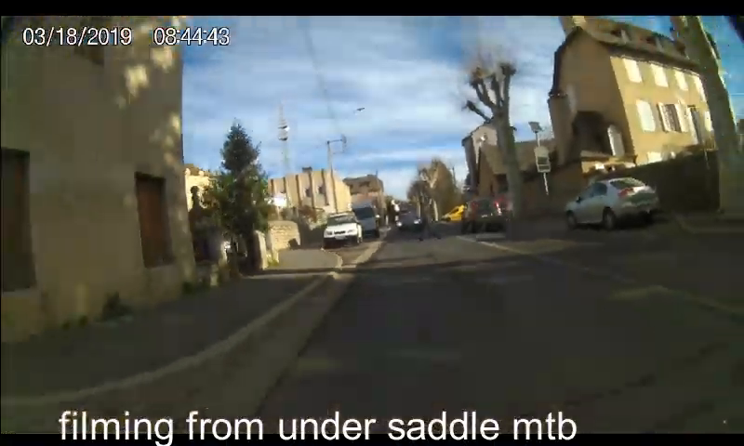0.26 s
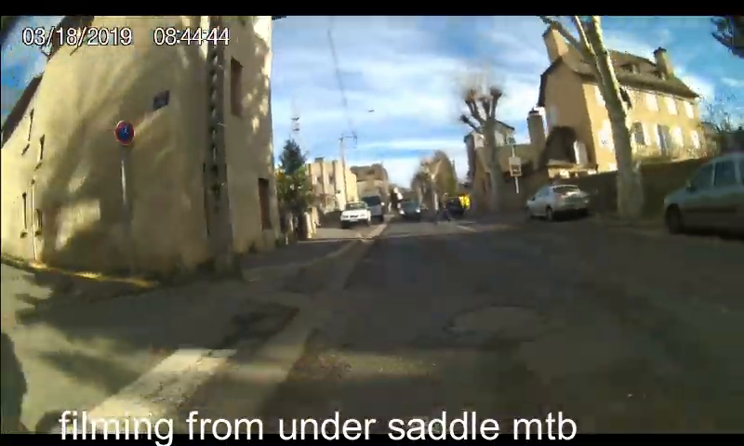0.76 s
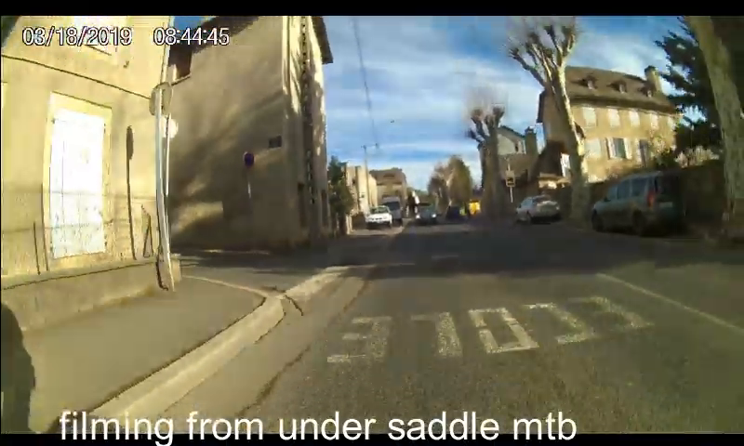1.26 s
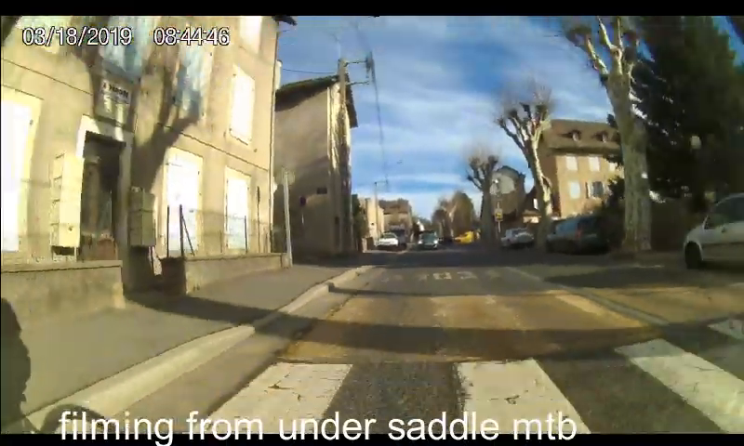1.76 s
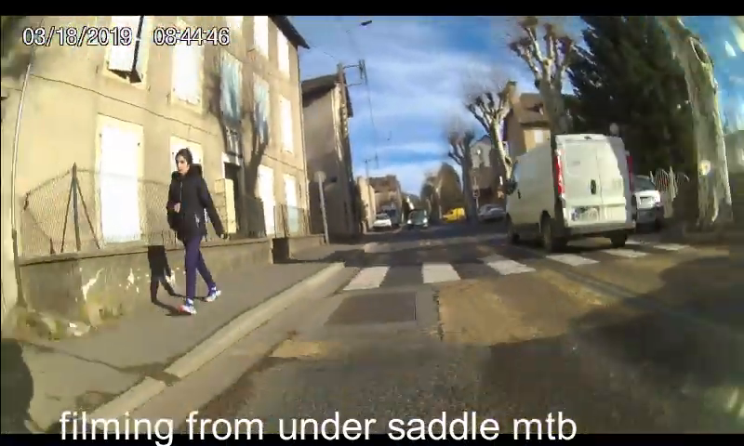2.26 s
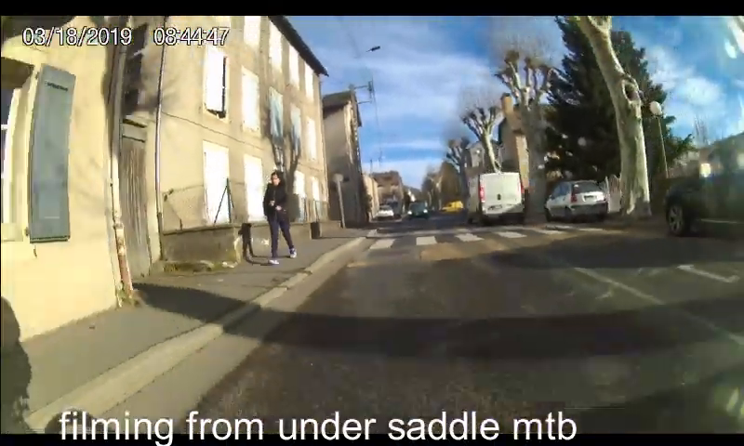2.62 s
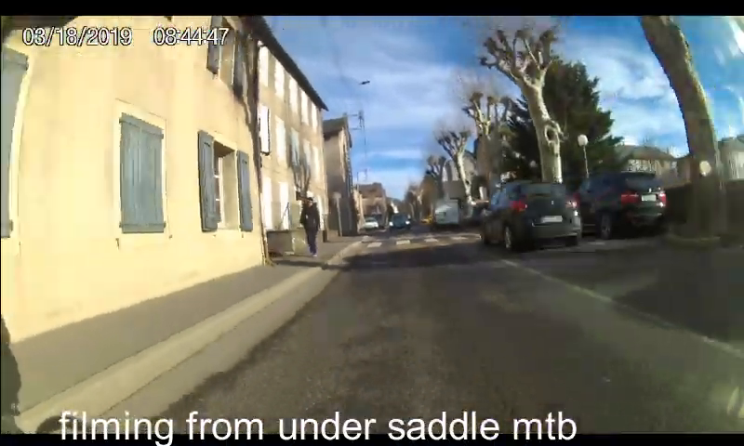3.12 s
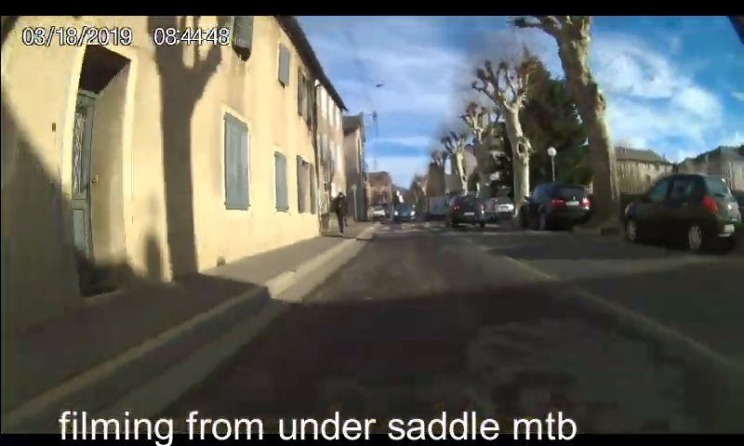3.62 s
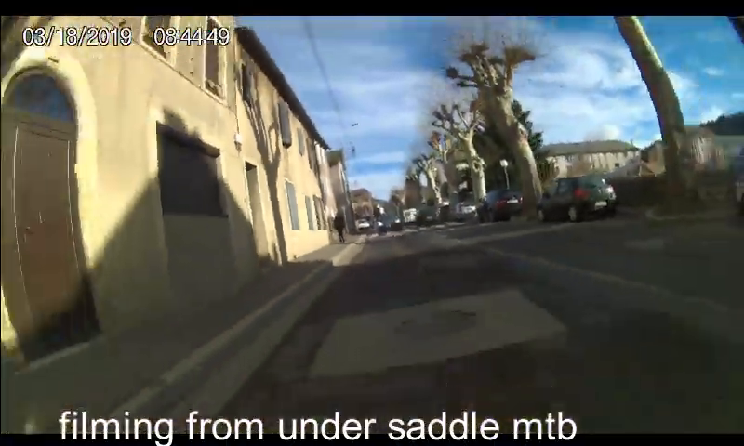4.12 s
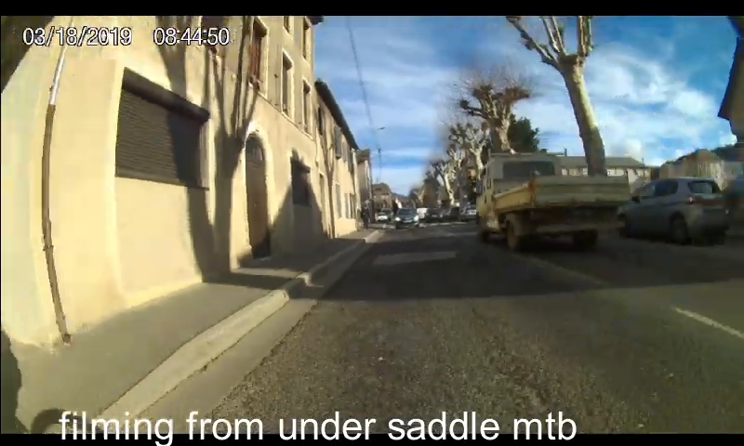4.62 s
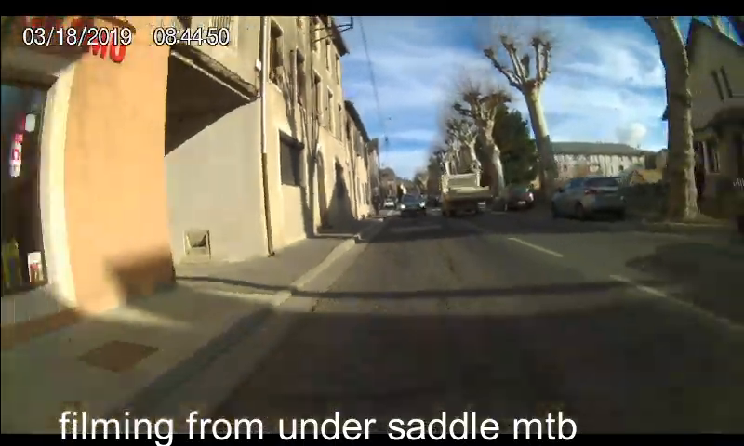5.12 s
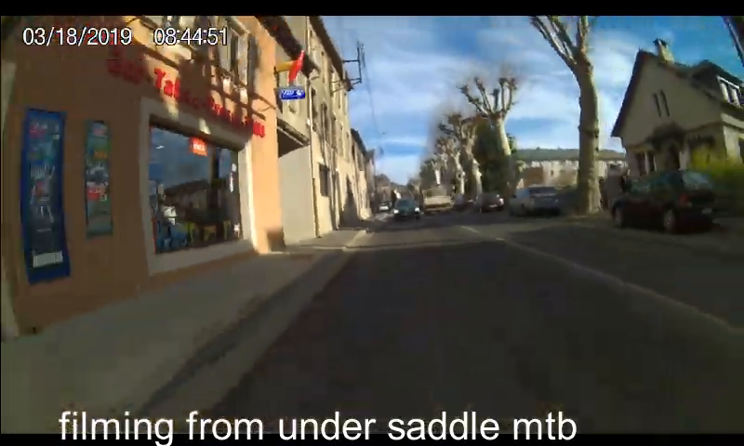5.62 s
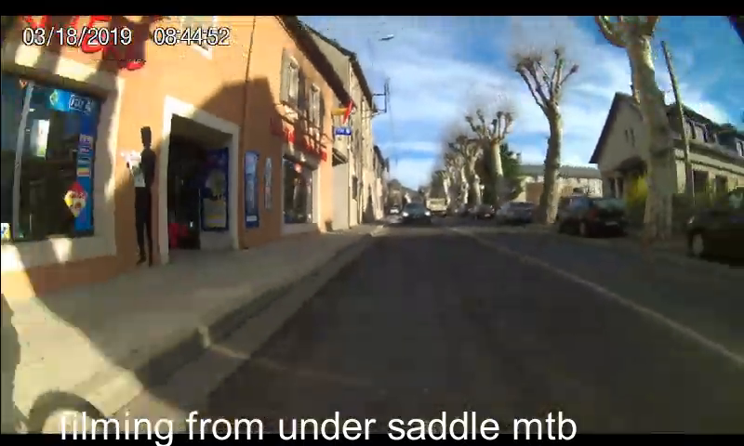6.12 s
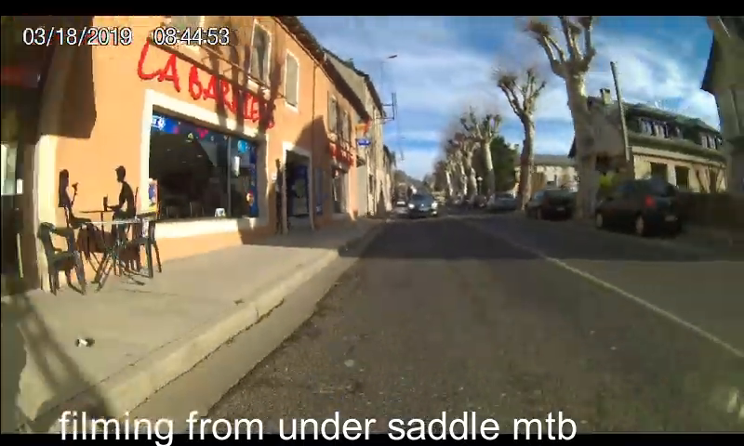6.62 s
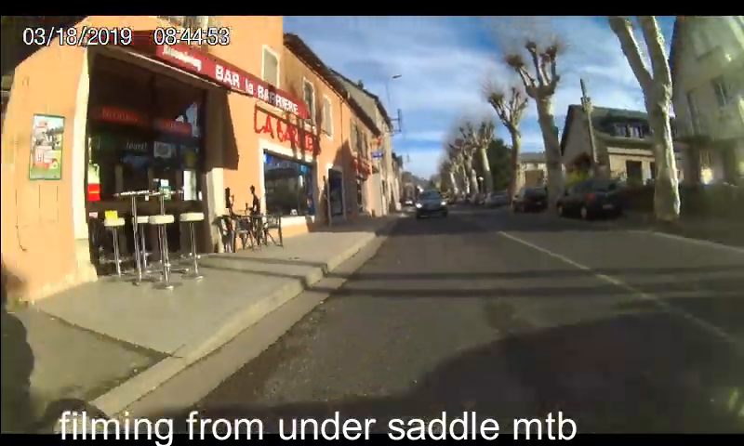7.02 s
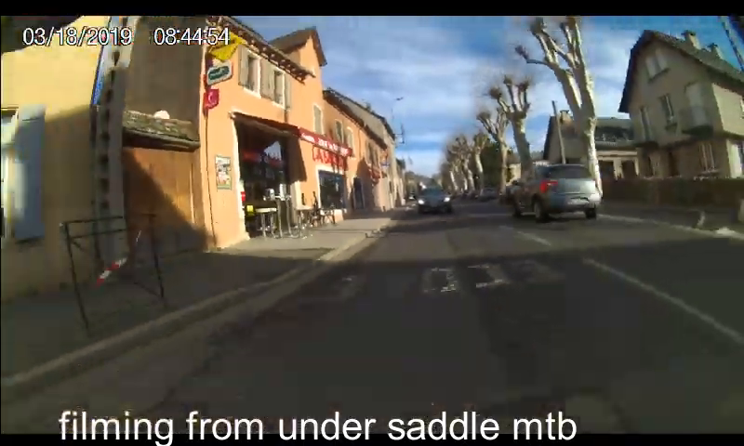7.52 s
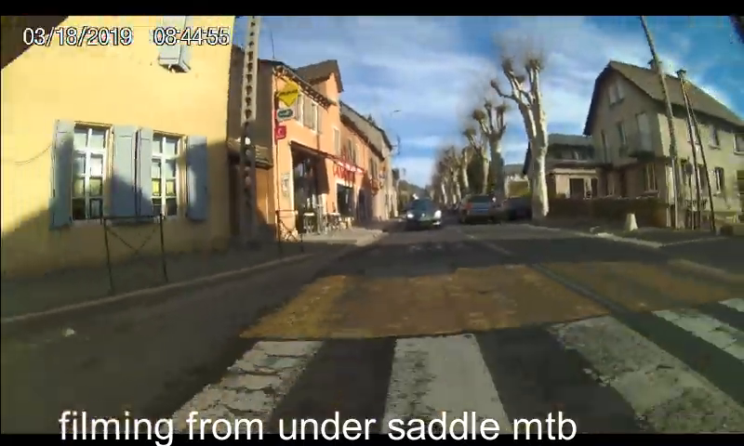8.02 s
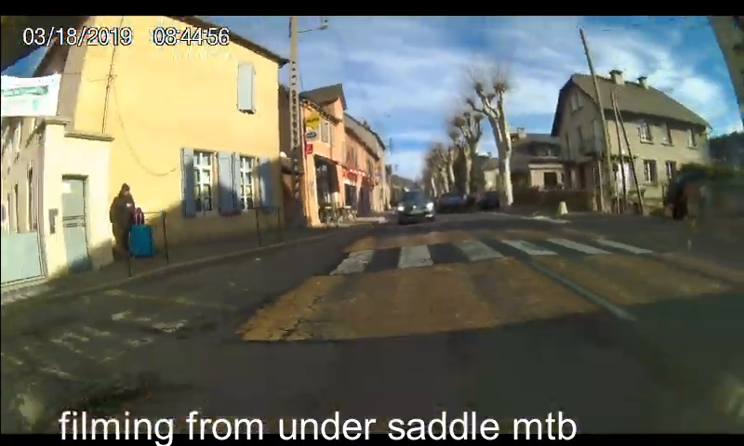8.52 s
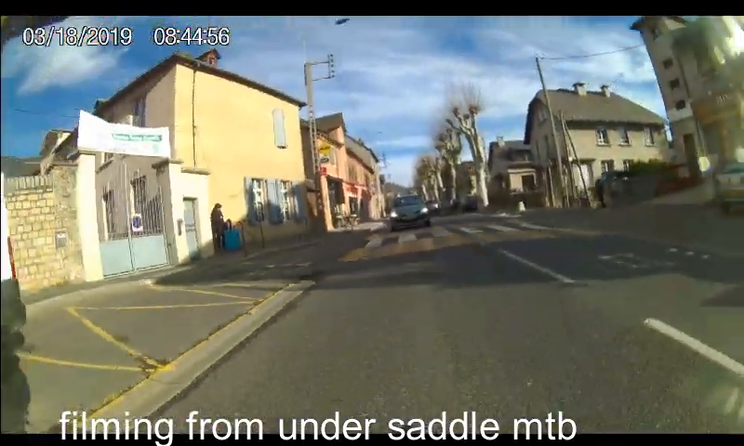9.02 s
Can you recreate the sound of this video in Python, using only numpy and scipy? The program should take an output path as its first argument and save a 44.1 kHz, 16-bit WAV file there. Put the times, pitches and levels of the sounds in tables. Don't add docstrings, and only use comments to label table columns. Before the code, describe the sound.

A small plastic camera mounted under a bicycle saddle rattles on a paved street. Dry, hollow clacks come unevenly, roughly ten per second, first fairly plain, then with looser clicking and chatter over patched road and a raised crossing. A quiet frame buzz and low wind rumble lie underneath. The microphone is inside the knocked case, very close, muffled in the treble, clipping on hard blows.

```python
import sys
import numpy as np
from scipy import signal
from scipy.fft import rfft, irfft
from scipy.io import wavfile
from scipy.ndimage import uniform_filter1d

SR = 44100
rng = np.random.default_rng(int(sys.argv[2]) if len(sys.argv) > 2 else 0)


def inscribe(sig):
    pcm = np.round(np.clip(np.atleast_2d(sig).T, -1, 1) * 32767)
    wavfile.write(sys.argv[1], SR, pcm.astype(np.int16))


def undo_db(level):
    steps = np.asarray(level, float) / 20
    return 10 ** steps


N = 408366

# start in seconds, frame buzz level in dB, wind level in dB.
RIDE_LEVELS = [(0.0, -34.5, -45), (0.46, -36.5, -53), (0.82, -36.5, -56.5), (2.71, -35.5, -51.5),
               (2.81, -34.5, -50), (3.61, -36.5, -59.5), (4.13, -37, -51), (4.74, -36, -50),
               (5.16, -36, -56), (5.67, -33.5, -55), (5.96, -34, -59.5), (6.5, -34.5, -50),
               (7.19, -33.5, -50.5), (7.45, -35, -50.5), (8.85, -34, -50.5), (9.26, -31.5, -49.5)]

# frequency in Hz, level in dB, t60 in seconds.
FRAME_MODES = [(360, -7, 0.023), (756, 0.5, 0.014), (1040, 7, 0.012), (1362, 9, 0.023), (1982, 5, 0.018),
               (2780, -9.5, 0.039), (3040, -6.5, 0.019)]
# frequency in Hz, level in dB, t60 in seconds.
TYRE_CAVITY_MODES = [(258, 0, .12)]
# frequency in Hz, level in dB, t60 in seconds.
MOUNT_MODES = [(2050, -5, .006), (2470, 0, .009), (2850, -1, .007), (3150, -5, .006)]
# frequency in Hz, level in dB, t60 in seconds.
CLIP_MODES = [(1510, -10.5, 0.036), (2114, 5, 0.0099), (2963, 10, 0.0054), (3770, 10.5, 0.0029),
              (4290, 5, 0.0057), (5100, -3, 0.004)]
# frequency in Hz, level in dB, t60 in seconds.
CLIP_CRACK_MODES = [(6700, 6, 0.003), (9650, 3, 0.0014), (11300, 6, 0.002), (12700, 4, 0.002)]
# frequency in Hz, level in dB, t60 in seconds.
CASE_MODES = [(390, -6, .016), (775, -7, .024), (1070, 5, .007), (1356, 13, .020), (1456, -2, .033)]
CASE_SIGNS = [-1, 1, 1, -1, 1]
# frequency in Hz, level in dB, t60 in seconds.
DOOR_MODES = [(1775, 12, .022), (1856, 21, .013), (2009, 17, .008)]
DOOR_SIGNS = [-1, 1, -1]
# frequency in Hz, level in dB, t60 in seconds.
LID_MODES = [(2380, -10, .015), (2777, 5, .012), (3019, 2, .010)]
LID_SIGNS = [1, 1, -1]
# frequency in Hz, gain in dB.
MIC_RESPONSE = [(2500, 0), (3600, -2), (4400, -9), (5200, -19), (6200, -37), (7000, -36), (7900, -45),
                (8800, -35), (10000, -31), (15500, -31), (15900, -46), (17000, -75)]

# time in seconds, blow in dB.
EVEN_BLOWS = [(.0202, -8), (.0741, -5.5), (.1697, -23), (.2762, 2.5), (.399, -8.5), (.4351, -1),
              (.4752, -2.5), (.515, -6.5), (.598, .5), (.679, -7), (.7793, -16.5), (.8377, -3.5),
              (.9231, -1.5), (1.0427, .5), (1.128, -7), (1.248, -11.5), (1.3442, -2.5), (1.4991, -3),
              (1.5965, -19), (1.6918, -3), (1.7916, -6), (1.864, -3.5), (1.9264, -9), (1.9745, -15.5),
              (2.1067, -23.5), (2.143, -18), (2.1763, -1.5), (2.259, -3.5), (2.3523, 5),
              (2.415, -2.5), (2.4925, -3), (2.531, -15), (2.5767, -2.5), (2.6588, 1.5),
                     (2.7432, -4.5), (2.8083, -3), (3.0018, -17), (3.1712, -9), (3.8296, -12.5),
                     (3.837, -4.5), (3.8748, -13), (3.97, -15), (4.08, -9), (4.146, -8), (4.2174, 0),
                     (4.3382, -6.5), (4.4203, 0.5), (4.4977, -3.5), (4.5513, -6), (4.6472, -14),
                     (4.7145, -10.5), (4.7257, -16), (4.765, -4.5), (4.825, -3), (4.9238, -3), (5.0406, -5),
                     (5.1512, -18), (5.189, -4.5)]
# time in seconds,
# blow in dB.
PATCHED_BLOWS = [(3.1155, -7.5), (3.232, -5.5), (3.5241, -15.5), (3.6265, 7), (3.665, -4.5),
                 (3.6768, -16.5), (3.714, -23), (5.5379, -5), (5.5546, -11), (5.602, -16),
                 (5.6562, -9.5), (5.7356, -7.5), (5.807, -22), (5.86, -19), (5.8806, 6.5),
                 (5.9149, -16), (6.149, -22), (6.2265, 0), (6.2875, -7.5), (6.436, -24), (6.5365, 2),
                 (6.6658, -10), (6.7528, -11), (6.8796, -10), (6.9469, -16.5), (7.0338, -13.5),
                 (7.086, -25.5), (7.146, -17), (7.174, -14.5), (7.1915, -21),
                 (7.357, -12), (7.461, -7), (7.5635, -5.5), (7.676, -9), (7.765, -13.5), (7.7849, -8),
                     (7.8092, -12), (7.827, -17.5), (7.914, -12), (8.0768, -18), (8.495, -10.5),
                     (8.5627, -12), (8.6184, -6.5), (8.651, -17), (8.68, -27), (8.7036, -5), (8.755, -8.5),
                     (8.7947, -22), (8.8384, -23), (8.9015, -8), (8.925, -14), (8.9357, -18), (8.97, -24),
                     (9.022, -7.5), (9.079, -21)]
THROWING_BUMPS_EARLY = [(0.3619, 2.5, 0.0055, -18.5), (3.0971, 9, .025, -26.5), (3.1614, -9, .0066, -31),
                        (3.2178, 6, 0.012, -20), (3.314, -0.5, 0.0096, -24.5), (3.4186, 11.5, .03, -22.5),
                        (3.551, 7, .018, -27.5), (3.9463, -9, 0.0014, -24.5), (5.2221, 7.5, 0.005, -16),
                        (5.314, 7, 0.0099, -19), (5.4355, 6, .0097, -18.5), (5.5183, 4.5, 0.0053, -3.5),
                        (5.6321, 8.5, 0.012, -19.5), (5.719, -4, 0.0094, -24), (5.7563, 1, 0.01, -28.5),
                        (5.9907, 5.5, 0.022, -24.5)]
# time in seconds, blow in dB, clip landing delay in seconds, clip in dB.
THROWING_BUMPS_LATE = [(6.116, 7, 0.01, -26.5), (6.3503, 5, 0.014, -20), (6.5741, 0, 0.0073, -17.5),
                       (6.6575, 2, 0.0044, -16.5), (6.7867, 2.5, 0.0075, -19.5), (7.2685, 0.5, .007, -29),
                       (7.662, 8.5, 0.0087, -18), (7.8936, -0.5, 0.013, -25.5), (8.0321, 6, .007, -20),
                       (8.14, 4.5, 0.0079, -21), (8.218, 3, 0.0088, -8), (8.3431, 3, 0.016, -18.5),
                       (8.47, 6, 0.014, -29), (8.5203, -7.5, .0035, -13.5), (8.598, 10, .015, -15),
                       (8.7348, 8, 0.014, -18), (8.8836, 10.5, 0.012, -23.5), (9.0013, 11.5, 0.012, -19.5),
                       (9.1478, -1, 0.0051, -32)]
LONE_CLIP_STRIKES = [(3.2535, -19.5), (3.4008, -31), (3.6904, -34), (3.7057, -27), (3.7124, -20.5),
                     (3.7676, -16.5), (5.265, -26.5), (5.5505, -19.5), (5.5726, -25), (5.689, -29),
                     (5.7105, -25.5), (5.7505, -19), (5.867, -33), (6.459, -10), (6.7815, -23),
                     (6.963, -29), (7.3812, -29), (7.6903, -19.5), (7.753, -25), (7.7732, -19),
                     (7.7974, -23.5), (7.8052, -15), (7.868, -23.5), (8.0788, -20.5), (8.243, -31),
                     (8.2685, -22.5), (8.502, -21), (8.6587, -22.5), (8.72, -22), (9.0764, -16.5),
                     (0.408, -44), (2.7443, -31), (3.1407, -30), (3.7218, -37), (3.759, -35), (5.363, -40),
                      (5.459, -34), (5.505, -39), (5.604, -33), (5.74, -38), (5.8056, -40), (6.149, -44),
                      (6.452, -26.5), (6.5098, -39), (7.567, -34), (7.8189, -37), (7.942, -40),
                      (7.9536, -33), (8.0542, -39.5), (8.1056, -36), (8.2632, -23.5), (8.399, -42),
                      (8.412, -42), (8.6495, -24.5), (8.685, -37), (8.7158, -22), (8.8086, -24),
                      (8.9133, -18), (9.0292, -33), (9.1044, -26)]


def ring(drive, modes, signs=None):
    total = 0
    for k, (hz, db, t60_s) in enumerate(modes):
        decay = np.log(1000) / (max(t60_s, .002) * SR)
        pole = np.exp(2j * np.pi * hz / SR - decay)
        sign = signs[k] if signs else (-1) ** k
        total = total + undo_db(db) * sign * signal.lfilter([1], [1, -pole], drive).imag
    return total


def butter(x, hz, kind, order=2):
    return signal.sosfilt(signal.butter(order, hz, kind, fs=SR, output="sos"), x)


def unit(x):
    return x / np.sqrt(np.mean(x ** 2))


def spikes(time_s, size):
    index = np.clip((np.asarray(time_s) * SR).astype(int), 0, N - 1)
    return np.bincount(index, size, N)


def fading(impulses, fade_s):
    return signal.lfilter([1], [1, -np.exp(-1 / (fade_s * SR))], impulses)


def walk(rate_hz):
    hold = int(SR / rate_hz)
    levels = rng.standard_normal(N // hold + 1)
    return uniform_filter1d(np.repeat(levels, hold), hold)[:N]


def chatter(time_s, db, fade_s, share):
    burst = fading(spikes(time_s, undo_db(db)), fade_s)
    return burst * rng.standard_normal(N) * (rng.random(N) < share)


def blows():
    bumps = [row[:2] for row in THROWING_BUMPS_EARLY + THROWING_BUMPS_LATE]
    even = EVEN_BLOWS
    patched = PATCHED_BLOWS
    return np.transpose(sorted(even + patched + bumps))


def wind():
    start_s, _, wind_db = np.transpose(RIDE_LEVELS)
    db = np.interp(np.arange(N) / SR, start_s, wind_db) + 4.5 + 1.5 * walk(9)
    gusts = rng.standard_normal(N) * undo_db(2.5 * walk(20))
    rumble = butter(butter(gusts, 135, "low"), 55, "high")
    return unit(rumble) * undo_db(db)


def frame_buzz():
    start_s, buzz_db, _ = np.transpose(RIDE_LEVELS)
    blow_s, blow_db = blows()
    shudder = fading(spikes(blow_s, undo_db(0.21 * blow_db)), fade_s=0.015)
    db = np.interp(np.arange(N) / SR, start_s, buzz_db) - 2.0 + 9.5 * shudder
    struck = rng.random(N) < 80 / SR
    grit = struck * undo_db(1.34 * rng.exponential(size=N)) * rng.standard_normal(N)
    grain = rng.standard_normal(N) * undo_db(2.6 * walk(70))
    hum = butter(ring(grain + undo_db(15) * grit, FRAME_MODES), 4100, "low", order=3)
    cavity = ring(rng.standard_normal(N), TYRE_CAVITY_MODES)
    return unit(hum) * undo_db(db + 1.5) + unit(cavity) * undo_db(.5 * db - 31.5 + 2 * walk(8))


def swing_touches(count=4):
    swing_s, touch_db, scatter_db, settle_s = .042, -38, 3.5, .025
    blow_s, blow_db = blows()
    blow_s = blow_s[blow_db > -12.5]
    touch_s = blow_s[:, None] - swing_s * np.arange(1, count + 1)
    level_db = touch_db + scatter_db * rng.standard_normal((len(blow_s), count))
    quiet = touch_s > np.r_[0, blow_s[:-1]][:, None] + settle_s
    return touch_s[quiet], level_db[quiet]


def mount_taps():
    touch_s, db = swing_touches()
    contact = chatter(touch_s, db - 1, fade_s=.003, share=.4)
    return ring(butter(contact, 6000, "low"), MOUNT_MODES)


def clip_touches(count=2):
    bounce_s, bounce_scatter, bounce_db, scatter_db = 0.0073, .4, -14, 3.5
    bumps = THROWING_BUMPS_EARLY + THROWING_BUMPS_LATE
    landings = [(blow_s + delay_s, db) for blow_s, _, delay_s, db in bumps]
    s, db = np.transpose(landings + LONE_CLIP_STRIKES)
    chance = rng.standard_normal((len(s), 2, count))
    gaps_s = bounce_s * np.exp(bounce_scatter * chance[:, 0])
    loss_db = bounce_db * np.arange(1, count + 1) ** .5 + scatter_db * chance[:, 1]
    again_s = s[:, None] + gaps_s.cumsum(axis=1)
    again_db = db[:, None] + loss_db
    return np.r_[s, again_s.ravel()], np.r_[db, again_db.ravel()]


def clip_ticks():
    touch_s, db = clip_touches()
    crack = ring(chatter(touch_s, 1.3 * db + 17, fade_s=.0025, share=.05), CLIP_CRACK_MODES)
    body = ring(chatter(touch_s, db - 1.5, fade_s=.0037, share=.055), CLIP_MODES)
    return body + crack


def with_rebounds():
    rebound_s, scatter_s, rebound_db, scatter_db = 0.016, 0.0019, -21.5, 2.5
    s, db = blows()
    chance = rng.standard_normal((len(s), 2)).T
    free = (db > -4.2) & (np.diff(s, append=99) > .03)
    again_s = s + rebound_s + scatter_s * chance[0]
    again_db = db + rebound_db + scatter_db * chance[1]
    s, db = np.r_[s, again_s[free]], np.r_[db, again_db[free]]
    order = np.argsort(s)
    return s[order], db[order]


def camera_knocks():
    s, db = with_rebounds()
    rebound = np.diff(s, prepend=-1) < .03
    s = s - .0002

    def push(push_db):
        return butter(spikes(s, undo_db(push_db)), 1810, "low")

    blow_db = 1.162 * db - 10
    contact = chatter(s, 1.42 * db - 26 + 4 * rebound, fade_s=.0022, share=.2)
    scuff = butter(contact, 3300, "low")
    case = ring(push(blow_db - 1.5 + 3 * rebound) + scuff, CASE_MODES, CASE_SIGNS)
    door = ring(push(blow_db - 4 * rebound) + undo_db(-3.5) * scuff, DOOR_MODES, DOOR_SIGNS)
    lid = ring(push(1.49 * db - 4) + undo_db(9) * scuff, LID_MODES, LID_SIGNS)
    return case + door + lid


def scene():
    knocks = butter(camera_knocks(), 180, "high", order=1)
    return (wind() + frame_buzz() + mount_taps() + clip_ticks() + knocks)[None]


def overload(dry):
    rail = .545
    railed = np.clip(dry, -rail, rail)
    railed = railed - undo_db(-9) * butter(railed, [120, 240], "band", order=1)
    excess = np.clip(abs(dry) / rail - 1, 0, 4)
    crackle = butter(np.sqrt(excess) * rng.standard_normal(N), [9000, 14500], "band")
    return railed + undo_db(-9) * crackle + undo_db(-51) * rng.standard_normal(N)


def sealed_microphone(x):
    size = 1024
    hz, db = np.transpose(MIC_RESPONSE)
    gain_db = np.interp(np.arange(size // 2 + 1) * SR / size, hz, db)
    cepstrum = irfft(np.log(undo_db(gain_db)), size)
    cepstrum[1:size // 2] *= 2
    cepstrum[size // 2 + 1:] = 0
    response = irfft(np.exp(rfft(cepstrum)), size)
    return signal.fftconvolve(x, response[None])[:, :N]


def whine():
    t = np.arange(N) / SR
    return undo_db(-83) * np.sin(2 * np.pi * 10018 * t) * np.cos(2 * np.pi * 37 * t)


def top_cut(x):
    return signal.sosfilt(signal.butter(12, 16460, fs=SR, output="sos"), x)


def record(dry):
    mix = sealed_microphone(overload(dry)) + whine()
    return top_cut(mix)


dry = scene()
out = record(dry)
inscribe(out)
```